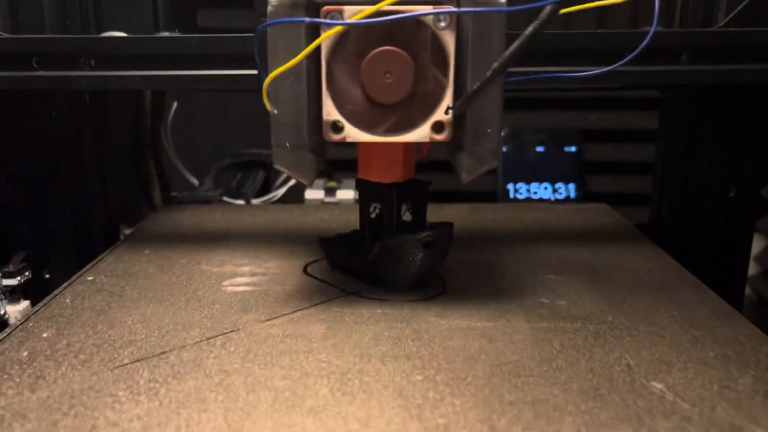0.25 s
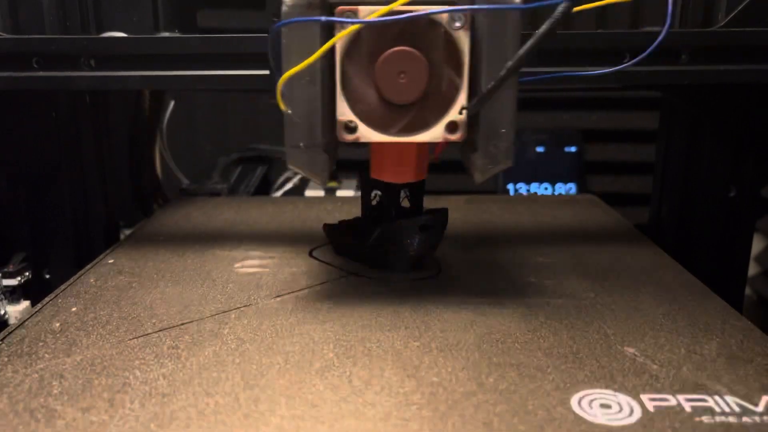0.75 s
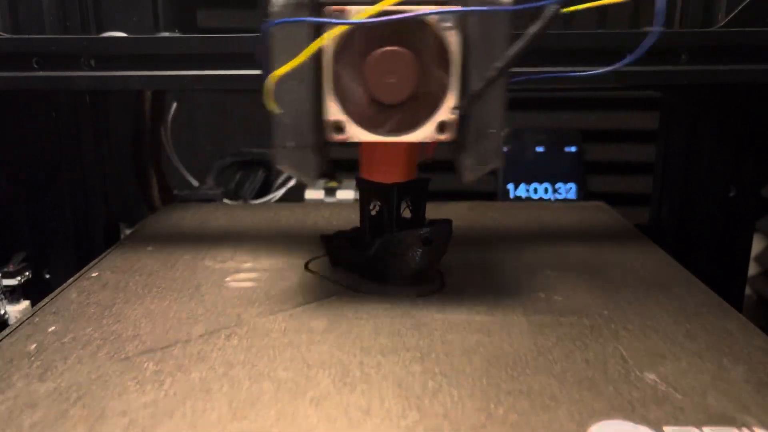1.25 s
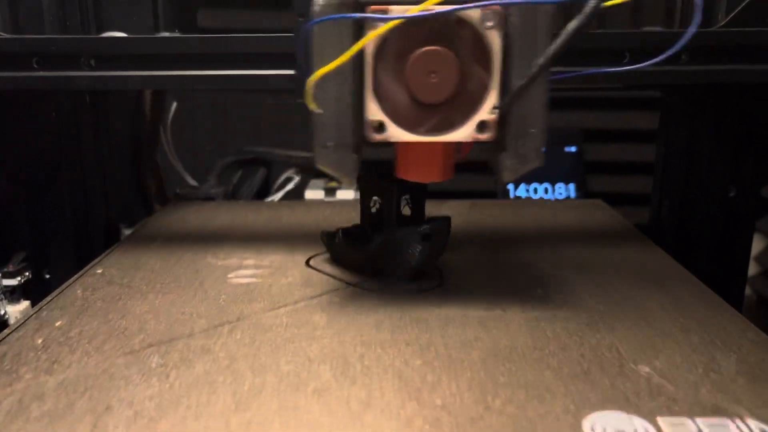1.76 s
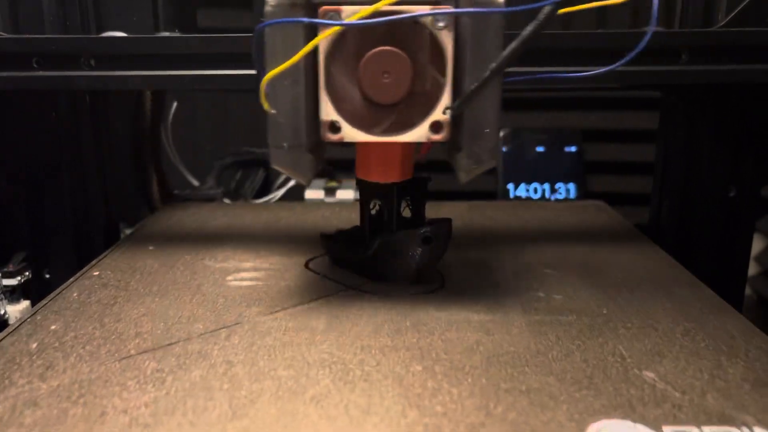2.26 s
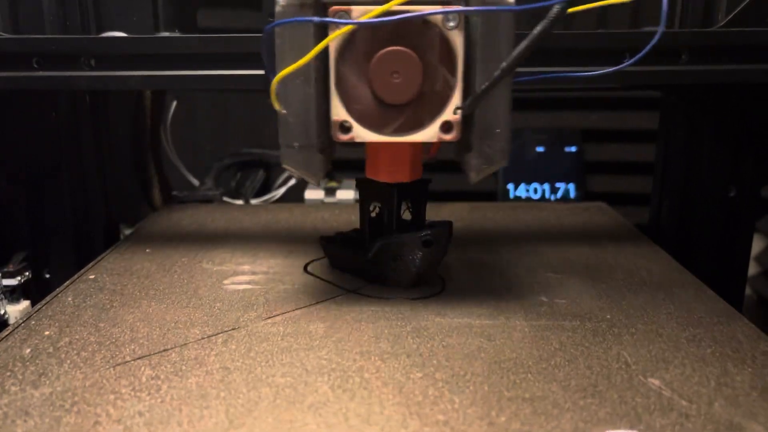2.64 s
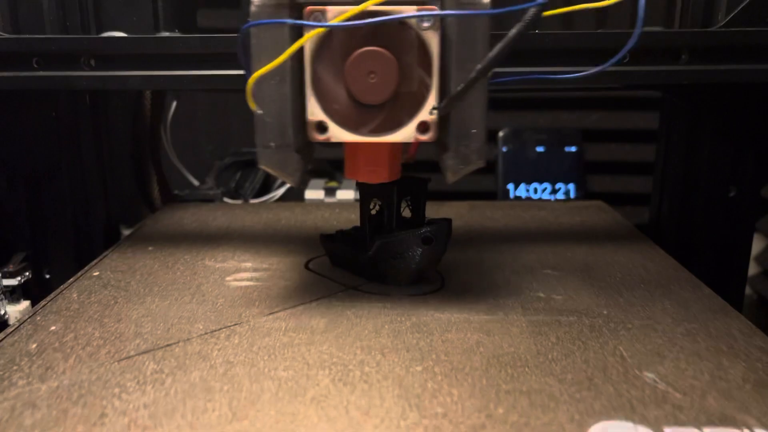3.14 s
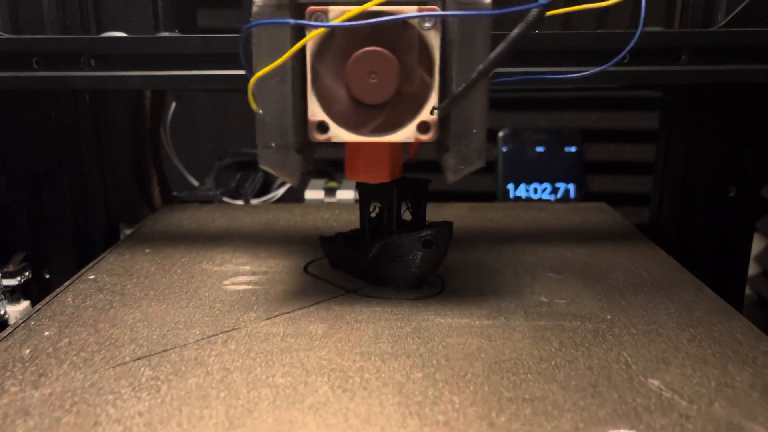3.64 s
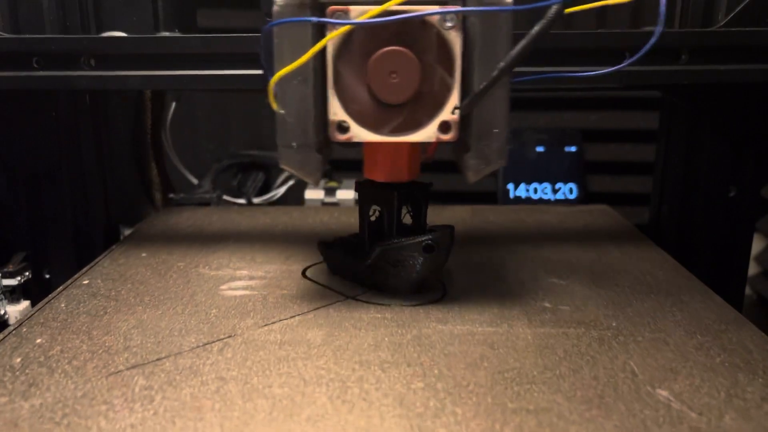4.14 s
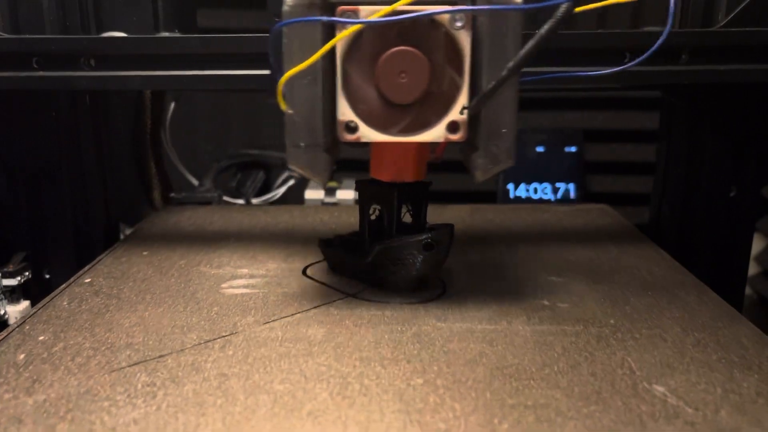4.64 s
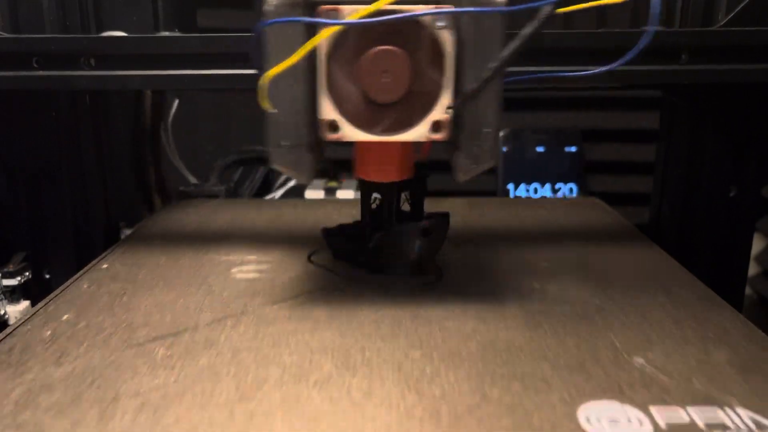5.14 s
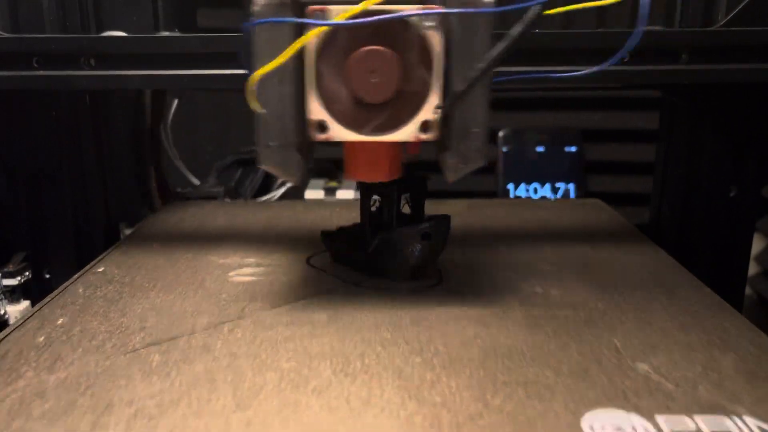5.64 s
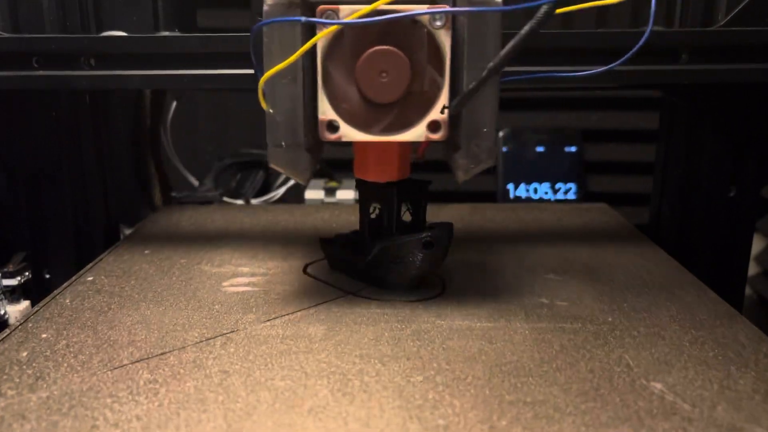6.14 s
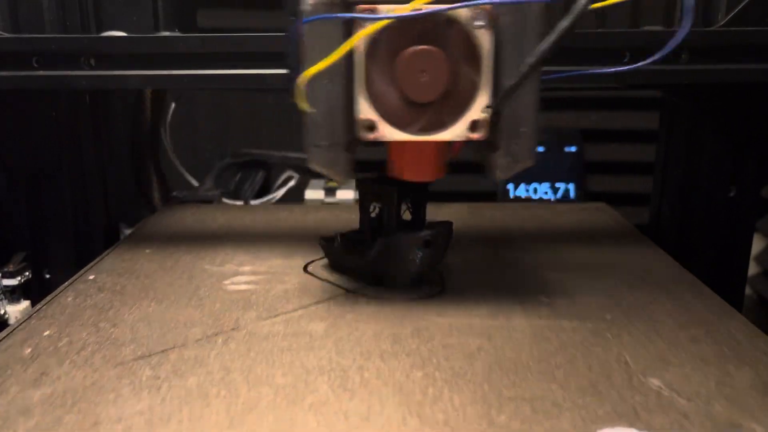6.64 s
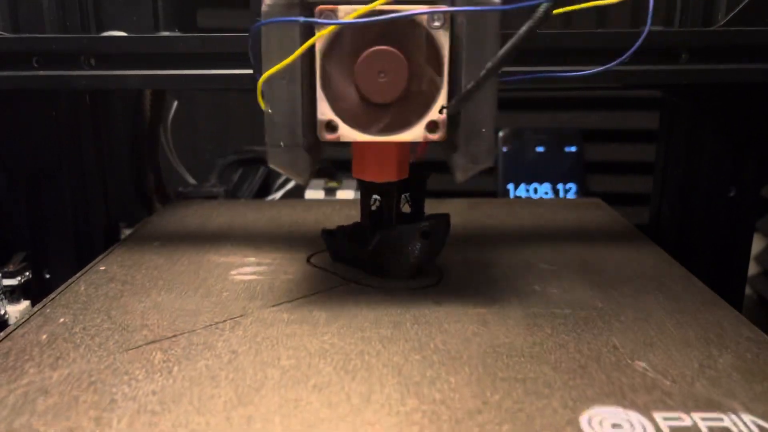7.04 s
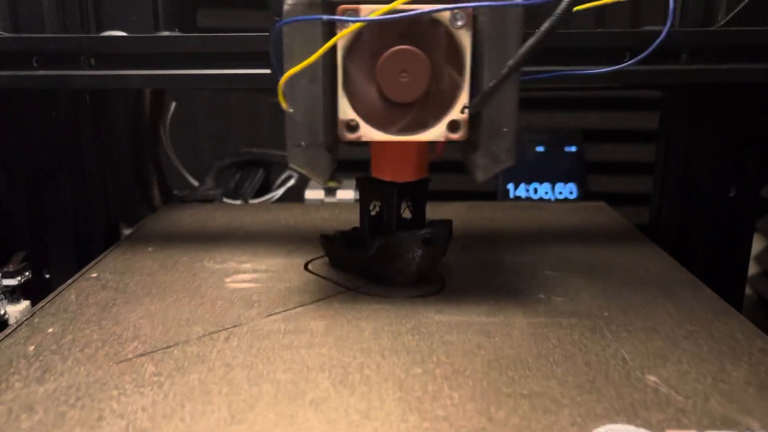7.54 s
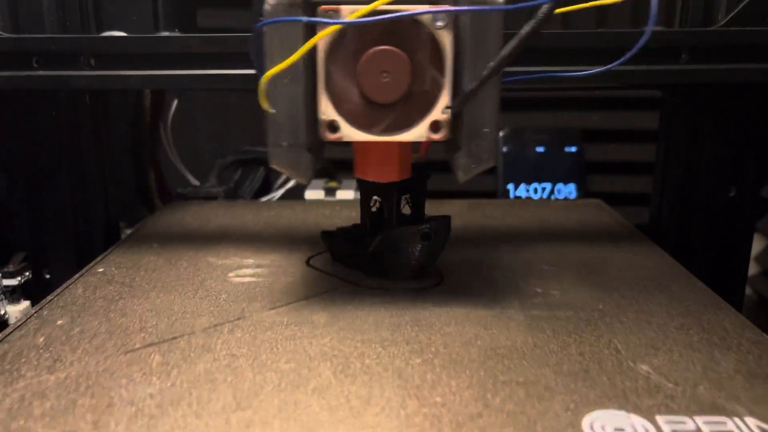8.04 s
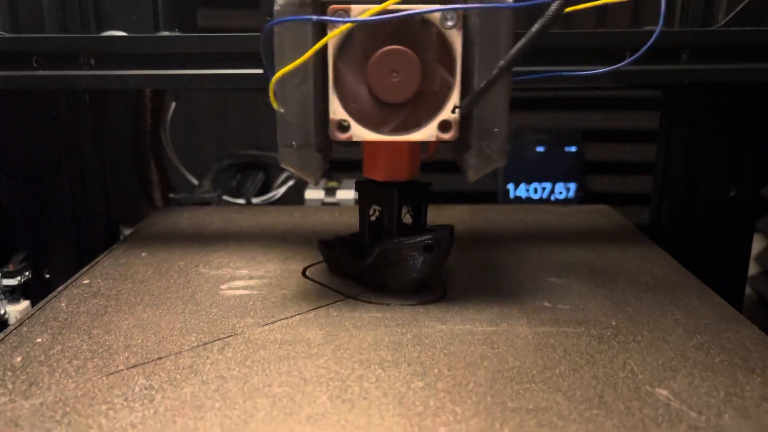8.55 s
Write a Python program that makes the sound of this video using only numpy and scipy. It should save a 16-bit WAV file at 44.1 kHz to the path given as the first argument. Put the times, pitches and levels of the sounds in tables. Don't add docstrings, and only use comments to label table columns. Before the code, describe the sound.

A small printing machine runs throughout, heard very near through two microphone ports. Dark fan noise and fluttering housing tones stay nearly steady while the moving bed makes the frame rumble and panels swell. Very brief low motor hums and higher gliding chirps come in irregular bursts, with tiny carriage clicks. Several dull low thumps mark bed reversals; the last seconds are mostly fan and rumble.

```python
import sys
import numpy as np
from scipy import signal
from scipy.fft import rfft, irfft, next_fast_len
from scipy.io import wavfile
from scipy.ndimage import uniform_filter1d, map_coordinates

SR = 44100
rng = np.random.default_rng(int(sys.argv[2]) if len(sys.argv) > 2 else 0)


def wav_record(signal):
    frames = np.transpose(np.atleast_2d(signal))
    bounded = np.clip(frames, -1, 1)
    quanta = np.round(bounded * 32767).astype(np.int16)
    wavfile.write(sys.argv[1], SR, quanta)


def level_to_linear(level):
    exponent = np.asarray(level, float) / 20
    return 10 ** exponent


N = 387638

# (centre [s], step rate [Hz], level [dB], microstep overtone [dB])
TRAVELS = [(0.021, 250, -35.5, -3), (0.728, 248, -36.5, -9), (0.841, 249.6, -32.5, -14),
           (0.977, 253.6, -29.5, -31), (1.096, 232, -34.5, -14), (1.293, 235, -33, -18),
           (1.382, 284, -34, -14), (1.432, 314, -37, -24), (1.497, 252, -37, -25), (1.517, 327, -33, -31),
           (1.769, 247.6, -32, -19), (3.447, 297, -36.5, -20), (3.558, 694, -39.5, -14),
           (3.816, 233, -36.5, -11), (5.111, 231.6, -29, -22), (5.17, 249.6, -30.5, -25),
           (5.289, 246, -34.5, -11), (5.422, 224, -35.5, -8), (5.675, 248.4, -35.5, -12),
           (5.772, 255, -40, -15), (5.801, 327, -32, -26), (6.418, 264, -35.5, -10), (6.557, 237, -36, -20),
           (6.686, 258, -32, -20), (6.875, 332, -32.5, -32), (6.927, 273, -32.5, -33),
           (7.012, 266, -33, -24), (7.206, 246, -37, -10.5), (7.413, 262, -42, -12), (8.505, 263, -38, -20)]
# (centre [s], start pitch [Hz], end pitch [Hz], length [s], level [dB])
GLIDES = [(0.101, 1265, 1340, .025, -47), (0.1, 1430, 1430, .025, -50), (0.118, 344, 335, 0.033, -29.5),
          (0.793, 1057, 1105, .04, -54), (0.971, 807, 1100, 0.043, -48.5), (1.12, 1060, 1100, .03, -50),
          (1.143, 334, 397, 0.19, -40.5), (1.38, 1313, 1340, 0.026, -45), (1.4, 965, 1004, .03, -48),
          (1.293, 996, 964, .03, -58), (6.568, 990, 1010, 0.055, -52), (6.669, 970, 994, 0.053, -55),
          (6.428, 1110, 980, 0.042, -51), (0.713, 1085, 1010, 0.03, -47), (5.144, 950, 1280, .045, -48),
          (5.40, 910, 1450, 0.012, -40), (5.405, 990, 970, .03, -51), (5.677, 1100, 955, 0.023, -43),
          (5.705, 1010, 1010, .02, -48), (5.768, 1270, 1420, .02, -51), (5.788, 1430, 1226, .022, -44),
          (5.808, 1210, 950, 0.025, -54), (5.795, 535, 486, .04, -36), (6.916, 996, 974, 0.032, -47),
          (2.72, 482, 525, .035, -37), (3.10, 484, 480, 0.036, -41), (3.511, 523, 438, 0.05, -35),
          (3.718, 502, 568, 0.037, -33), (4.32, 460, 450, .04, -38), (7.4, 1306, 770, .04, -47),
          (8.234, 1050, 1070, .03, -58)]


def unit(x):
    return x / np.sqrt(np.mean(x ** 2) + 1e-20)


def along(points, hz):
    f, v = np.transpose(points)
    return np.interp(np.log(hz + 1), np.log(f + 1), v)


def wobble(rate):
    knots = rng.standard_normal(int(N * rate / SR) + 4)
    return map_coordinates(knots, [np.arange(N) * rate / SR])


def filtered(x, response):
    m = next_fast_len(N + SR // 2)
    return irfft(rfft(x, m) * response(np.fft.rfftfreq(m, 1 / SR)), m)[..., :N]


def panned(x, balance_db):
    return x * level_to_linear(np.array([[balance_db / 2], [-balance_db / 2]]))


def swells(rows):
    t = np.arange(0, N, 64) / SR
    curve = sum(db * np.exp(-((t - s) / length) ** 2) for s, db, length in rows)
    return np.interp(np.arange(N) / SR, t, curve)


def shaken(x, level_db, span_s=0.15):
    power = uniform_filter1d(np.mean(x ** 2, axis=0), size=int(span_s * SR))
    return x * level_to_linear(level_db - np.mean(level_db)) / np.sqrt(np.abs(power) / np.mean(x ** 2) + 1e-3)


def steppers():
    out = np.zeros((2, N))
    for s, hz, db, overtone_db in TRAVELS:
        u = np.linspace(-1, 1, int(0.038 * SR))
        step_hz = hz * (1.01 - .12 * np.abs(u) ** 3)
        phase = 2 * np.pi * (np.cumsum(step_hz) / SR + rng.random())
        overtone = level_to_linear(min(overtone_db, -15.5)) * np.sin(4 * phase)
        note = np.cos(np.pi / 2 * u) * (np.sin(phase) + overtone + level_to_linear(-19) * np.sin(2 * phase))
        start = round(s * SR) - len(u) // 2
        out[:, start:start + len(u)] += panned(level_to_linear(db + 1.5) * note, balance_db=-1.5)
    return out * level_to_linear(1.5 * wobble(70))


def chirps():
    # (frequency [Hz], left minus right [dB])
    glide_pan = [(350, -6), (1000, -5), (1500, -9)]
    out = np.zeros((2, N))
    for s, from_hz, to_hz, length, db in GLIDES:
        u = np.linspace(0, 1, int(1.4 * length * SR))
        scatter = np.interp(u, np.linspace(0, 1, num=8), rng.standard_normal(size=8))
        step_hz = (from_hz + (to_hz - from_hz) * u) * (1 + .055 * scatter)
        phase = 2 * np.pi * (np.cumsum(step_hz) / SR + rng.random())
        swell = np.sin(np.pi * u) * (1 + 0.63 * scatter[::-1])
        note = level_to_linear(db + 0.5) * swell * np.sin(phase)
        start = round(s * SR) - len(u) // 2
        out[:, start:start + len(u)] += panned(note, along(glide_pan, from_hz))
    return out


def motors():
    notes = steppers() + chirps()
    mode = lambda f, hz, width: 1j * f * width / (hz * hz - f * f + 1j * f * width)
    gantry = lambda f: .7 * mode(f, hz=992, width=35) + .6 * mode(f, hz=250, width=25)
    return notes + filtered(notes, gantry)


def jolts():
    # (time [s], peak [dB], swing rate [Hz], direction [+1 or -1])
    reversals = [
        (0.0973, -12, 80, 1),
        (0.114, -30, 70, 1),
        (0.262, -21.5, 75, -1),
        (1.70, -29, 74, 1),
        (2.251, -20, 50, 1),
        (4.135, -17, 55.4, 1),
        (5.557, -25, 55, 1),
        (5.75, -18.5, 100, 1),
    ]
    out, t = np.zeros(N), np.arange(N) / SR
    for s, db, hz, direction in reversals:
        cycles = (t - s) * hz
        swing = np.cos(2 * np.pi * cycles) + .3 * np.cos(4 * np.pi * cycles)
        out += np.sign(direction) * level_to_linear(db) * np.exp(-np.abs(cycles / .44) ** 1.5) * swing
    return filtered(out, lambda hz: hz ** 2 / (hz ** 2 + 30 ** 2))


def ticks():
    # (time [s], peak [dB], dull part [dB], brilliance [dB])
    tick_events = [(0.0867, -48, -4, -25), (0.4179, -56, -4, -31), (0.7168, -51, -4, -28),
                   (1.504, -50, 3, -35), (1.722, -48, -4, -23), (1.9714, -49, -1, -26),
                   (2.4104, -57, -4, -28), (3.1378, -60, -4, -28), (3.3994, -60, -4, -27),
                   (4.0948, -48, -6, -24), (4.0972, -51, -7, -18.5), (4.1062, -56, -8, -34),
                   (4.6374, -55, -6, -23), (4.9494, -56, -4, -25), (5.017, -53, -4, -30),
                   (5.1272, -52, -4, -26), (5.1357, -57, -6, -24), (5.1580, -50, -2, -23),
                   (5.1712, -48, -4, -26), (5.252, -53, -6, -25), (5.3941, -49, -4, -34),
                   (5.465, -49, -7, -31), (5.6884, -52, -2, -30), (5.7602, -57, -8, -22),
                   (5.7666, -46, -5, -20.5), (5.7985, -52, -9, -34), (6.429, -48, -4, -23),
                   (6.912, -56, 5, -29), (7.2684, -52, -4, -22), (7.8194, -58, -4, -27),
                   (8.4861, -48, -4, -22)]
    # (frequency [Hz], level [dB])
    click_colour = [(1000, -30), (5000, -10), (8500, 0.5), (10500, -12), (11800, -11), (13000, -34),
                    (14900, -30), (15400, -15), (15800, -17)]
    click, bright, dull = np.zeros((3, 2, N + SR))
    t = np.arange(SR // 20) / SR
    noises = rng.standard_normal((len(tick_events), 4, len(t)))
    for (s, db, dull_db, bright_db), noise in zip(tick_events, noises):
        start = round(s * SR)
        span = slice(start, start + len(t))
        snap = level_to_linear(db + 2.5 - 60 * t / 0.015) * noise[[0, 2, 3]]
        click[:, span] += snap[0] + .2 * snap[1:]
        bright[:, span] += level_to_linear(2.2 * bright_db + 44 - 60 * t / .012) * snap[1:]
        dull[:, span] += level_to_linear(db + dull_db - 60 * t / 0.068) * noise[1]
    snaps = filtered(click[:, :N], lambda hz: level_to_linear(along(click_colour, hz)))
    scrape = filtered(dull[:, :N], lambda hz: 1 / (1 + ((hz - 7000) / 3500) ** 2))
    metal = filtered(bright[:, :N], lambda hz: (hz > 8200) * (1 - .3 * (np.abs(hz - 12700) < 1100)))
    return snaps + scrape + metal


def fan():
    # (time [s], shaft rate [Hz])
    shaft_speed = [(0.0, 29.13), (0.6, 29.12), (1.1, 29.35), (1.7, 28.85), (1.95, 28.76), (2.3, 29.02),
                   (2.65, 29.02), (2.9, 29.16), (3.75, 29.14), (4.55, 28.86), (5.2, 28.88), (5.8, 29.09),
                   (6.3, 28.81), (7.05, 28.93), (7.5, 29.14), (8.75, 29.25)]
    # (shaft order [multiple], level [dB], left minus right [dB], left port's lead [rad])
    shaft_tones = [(2, -54, 6, -0.4), (3, -41.5, -1.5, 2.5), (6, -47, -3, 1.24), (8, -62, -3, 0),
                   (12, -45, -3.5, -0.6), (17, -55, 2, -1.9), (18, -50, -7, 0.28), (19, -56.5, -10, -0.5),
                   (21, -60.5, -10, 0.7), (24, -67.5, -11, 0.2)]
    out = np.zeros((2, N))
    shaft_hz = np.interp(np.arange(N) / SR, *np.transpose(shaft_speed))
    turns = np.cumsum(shaft_hz * (1 + 0.001 * wobble(3.94))) / SR
    for order, db, balance_db, lead in shaft_tones:
        tone = np.sin(2 * np.pi * round(order) * turns + np.array([[lead], [0]]))
        out += panned(np.sqrt(2) * level_to_linear(db + 2.9 * wobble(4.5)) * tone, balance_db)
    return out


def rush(left, right, band, patchy_db):
    # (frequency [Hz], likeness [0-1])
    likeness = [(25, 0.6), (50, .92), (130, 0.67), (230, 0.44), (290, 0.03), (430, 0.03), (530, 0.68),
                (680, 0.35), (900, 0.75), (1060, .85), (1250, 0.75), (1390, 0.46), (1480, 0.83),
                (2100, 0.68), (2650, 0.86), (3230, 0.44), (3700, 0.4), (4200, 0.47), (5080, .2),
                (6890, 0.74),
                (7500, .6), (8250, .995), (10250, .995), (10800, .4), (11300, .6), (11650, .88),
                       (12000, .997), (13750, .997), (14300, .3), (14800, .6), (15200, .99)]
    z = signal.stft(rng.standard_normal((2, N)), nperseg=512)[2]
    patches = uniform_filter1d(rng.standard_normal(z.shape[1:]), size=5, axis=0)
    patches = uniform_filter1d(patches, size=10, axis=1)
    pair = unit(signal.istft(z * level_to_linear(patchy_db * unit(patches)), nperseg=512)[1][:, :N])
    angle = lambda hz: np.arccos(np.clip(along(likeness, hz), -1, 1)) / 2
    mid, side = filtered(pair, lambda hz: band(hz) * np.array([np.cos(angle(hz)), np.sin(angle(hz))]))
    density = lambda hz: level_to_linear(np.array([along(left, hz), along(right, hz)])) * np.sqrt(SR / 2)
    return filtered(np.array([mid + side, mid - side]), density)


def air():
    # (frequency [Hz], density [dB per Hz])
    rumble_left = [(13, -71), (18, -81), (51, -55.5), (94, -51.5), (107, -58), (150, -61.5), (215, -67),
                   (300, -65.5), (430, -66), (470, -69.5), (510, -62), (535, -68), (580, -76.5), (660, -79),
                   (700, -73.5), (799, -77.5)]
    # (frequency [Hz], density [dB per Hz])
    rumble_right = [(13, -76), (18, -85), (48, -54), (94, -50.5), (145, -61.5), (220, -62), (269, -62),
                    (301, -58), (349, -59), (392, -72.5), (425, -69), (470, -64), (616, -66), (643, -67),
                    (799, -71.5)]
    # (frequency [Hz], density [dB per Hz])
    hiss_left = [(818, -74.5), (930, -76.5), (1010, -77), (1050, -73.5), (1220, -74.5), (1270, -78.5),
                 (1390, -77.5), (1560, -75.5), (1650, -78), (2150, -80), (2280, -87), (2420, -82.5),
                 (3050, -87.5), (3500, -87), (3850, -89), (4050, -91.5), (4500, -96.5), (4800, -98),
                 (5450, -96), (5950, -100.5), (6890, -100), (7493, -101.0), (8010, -104.5), (12876, -114.0),
                 (13824, -120.0), (14427, -116.0), (15073, -117.0), (15417, -123.0), (15640, -119.5)]
    # (frequency [Hz], density [dB per Hz])
    hiss_right = [(818, -70.5), (1130, -72), (1170, -72.5), (1210, -70.5), (1260, -75), (1380, -73.5),
                  (1520, -78), (1679, -72), (1790, -77), (1900, -75), (2080, -83), (2190, -76.5),
                  (2300, -82), (2430, -81), (2750, -80.5), (3000, -83.5), (3200, -83.5), (3550, -83),
                  (3750, -80), (3950, -90), (4160, -84), (4550, -92), (4750, -89.5), (4930, -85),
                  (5100, -92), (5700, -90.5), (6050, -94.5), (6847, -97), (7450, -101.0), (9259, -101.0),
                  (13824, -120.0), (14298, -116.0), (15640, -119.5)]
    # (time [s], shaking over usual [dB], length [s])
    table_lurches = [(.105, 13.5, 0.016), (.19, 5.5, 0.096), (.76, -5, 0.11), (.98, 1, 0.066),
                     (1.08, -2, 0.029), (1.61, 6, 0.12), (1.71, 10, 0.023), (1.92, -3, 0.14),
                     (2.25, 0, 0.088), (2.89, 5, 0.05), (3.11, 11, .08), (3.18, -9, 0.059),
                     (3.28, 4, 0.064), (4.11, 3, 0.096), (4.38, 9.5, 0.064), (4.48, -7.5, 0.19),
                     (4.87, 6, 0.069), (5.09, -18, 0.055), (5.16, 5.5, 0.045), (5.56, 10, 0.042),
                     (5.75, 10, 0.037), (6.24, -6, 0.037), (6.29, 6, .04), (6.95, -3, 0.022),
                     (7.17, -7, 0.051), (7.34, -6.5, 0.074), (7.61, -1.5, 0.19), (7.91, -1, 0.054),
                     (7.98, -4, 0.043), (8.08, 6, 0.062)]
    # (time [s], drumming over usual [dB])
    belt_pulls = [(.11, 9.5), (.22, -7), (.9, 4.5), (.98, 6), (1.71, 1), (1.84, -5.5), (2.25, 8.5),
                  (2.89, -0.5), (3.36, 1.5), (4.73, 2.5), (4.87, 2.5), (5.09, 0), (5.56, -2.5),
                  (5.83, -0.5), (6.17, -9.5), (6.24, -3), (6.83, -2), (6.9, 8), (7.34, 4.5), (7.46, -2),
                  (7.83, -5), (7.91, 4), (8.08, 2.5), (8.62, 1)]
    split_hz, pull_s = 808, 0.069
    low = rush(rumble_left, rumble_right, lambda hz: hz < split_hz, patchy_db=1.46)
    table = filtered(low, lambda hz: 1 / (1 + (hz / 95) ** 6))
    body = filtered(low, lambda hz: 1 - 1 / (1 + (hz / 230) ** 6))
    bed = low - table - body
    hiss = rush(hiss_left, hiss_right, lambda hz: hz >= split_hz, patchy_db=0.9)
    pulls = swells([(s, db, pull_s) for s, db in belt_pulls])
    note_dips = swells([(s, -4.5, 0.013) for s, *_ in TRAVELS + GLIDES])
    body_db = np.minimum(note_dips, 4) + 0.4 * pulls
    frame = shaken(table, swells(table_lurches)) + shaken(bed, pulls) + shaken(body, body_db)
    return frame + hiss * level_to_linear(0.081 * wobble(2.66) + 0.075 * wobble(8.2))


def ducts():
    # (frequency [Hz], width [Hz], level [dB], left minus right [dB])
    resonances = [(266, 30, -52, -8), (385.2, 28, -48.5, -7), (445, 74, -57.5, -2), (606, 61, -54, -13.5),
                  (706, 26, -58.5, -8), (984, 98, -65.5, -7.5), (1635, 77, -64, -9), (1890, 84, -65, -13.5),
                  (3676, 40, -68.5, 3), (6830, 110, -72, -2), (7960, 200, -77.5, 8), (8300, 160, -79, 2),
                  (9250, 150, -89, 8), (9300, 70, -103, 4)]
    out = np.zeros((2, N))
    for hz, width, db, balance_db in resonances:
        ring = filtered(rng.standard_normal(N), lambda f: 1 / (1 + ((f - hz) / width * 2) ** 2))
        out += panned(level_to_linear(db) * unit(ring * level_to_linear(2.9 * wobble(12))), balance_db)
    return out


def supply():
    # (mains multiple [-], level [dB], left minus right [dB])
    buzz_tones = [(2, -37, -1.5), (4, -46, -6.5)]
    out, t = np.zeros((2, N)), np.arange(N) / SR
    for multiple, db, balance_db in buzz_tones:
        tone = np.sin(2 * np.pi * (round(multiple) * 50 * t + rng.random()))
        out += panned(np.sqrt(2) * level_to_linear(db + 1.1 * wobble(4)) * tone, balance_db)
    return out


def whine():
    ring = filtered(rng.standard_normal(N), lambda f: 1 / (1 + ((f - 6363) / 22) ** 2))
    return panned(level_to_linear(-80.5) * unit(ring), balance_db=5)


def enclosure(x):
    # (frequency [Hz], half width [Hz])
    modes = [
        (100, 15),
        (350, 14),
        (386, 15),
        (522, 19),
        (192, 33),
        (650, 88),
        (278, 45),
    ]
    # (time [s], over usual [dB], length [s])
    floor = [(0.09, -9, 0.12), (0.67, -1.5, 0.15), (0.958, 4, 0.1), (2.68, -1.5, 0.069), (3.3, 4.5, 0.11),
             (4.22, -0.5, 0.11), (4.683, 3.5, 0.076), (5.106, -1, 0.12), (5.497, -3, 0.06),
             (7.16, -4.5, 0.15), (7.326, 7, 0.053), (7.59, -4, 0.11), (8.094, 4, 0.12)]
    # (time [s], over usual [dB], length [s])
    back = [(0.12, 3.5, 0.11), (1.06, 3.5, 0.12), (1.75, -6.5, 0.2), (2.1, 3.5, 0.06), (2.61, -3.5, 0.2),
            (2.95, -10, 0.065), (3.2, -3, 0.046), (3.36, 6.5, 0.029), (3.66, 5.5, 0.07), (4.4, 6, 0.089),
            (4.86, -8, 0.063), (5.2, 4.5, 0.067), (5.46, -3.5, 0.32), (6.21, -13, 0.059), (6.64, -10, 0.12),
            (6.89, 3, 0.13), (7.05, -4.5, 0.061), (7.3, -3.5, 0.34), (7.62, 9.5, 0.062), (7.84, -3, 0.22),
            (8.35, 3.5, 0.14), (8.57, -12, 0.038)]
    # (time [s], over usual [dB], length [s])
    flank = [(0.53, -8, 0.23), (1.19, 3.5, 0.11), (1.85, 10.5, 0.038), (1.96, -7, 0.064), (2.4, -7.5, 0.14),
             (2.72, 5, 0.16), (2.92, -2.5, 0.11), (3.53, 3, 0.52), (3.99, 0, 0.091), (4.13, 4.5, 0.051),
             (4.95, -5, 0.068), (5.14, 2, 0.13), (5.62, 9, 0.033), (5.92, -13, 0.077), (6.15, -12, 0.12),
             (6.39, 6, 0.04), (6.59, 9, 0.019), (6.78, 3.5, 0.07), (7.0, -4, 0.12), (7.12, 13, 0.03),
             (7.46, -7, 0.1), (7.59, 10, 0.033), (7.78, -9, 0.12), (7.95, 9.5, 0.07), (8.05, -15, 0.062),
             (8.18, 9.5, 0.062), (8.43, 6.5, 0.21)]
    # (time [s], over usual [dB], length [s])
    roof = [(0.55, -5.5, 0.28), (0.66, 7.5, 0.19), (1.67, -6, 0.057), (2.02, -2, 0.03), (2.5, -3, 0.14),
            (2.73, 6, 0.079), (3.03, 5, 0.026), (3.72, -9, 0.074), (3.82, -2, 0.15), (5.06, -9, 0.086),
            (5.27, 4.5, 0.17), (5.79, 2, 0.025), (7.34, 7, 0.084), (7.51, -3.5, 0.14), (7.94, 2, 0.15)]
    # (time [s], over usual [dB], length [s])
    door = [(1.37, 1, 0.39), (2.73, 4.5, 0.056), (3.56, -3, 0.28), (3.93, 5, 0.071), (4.07, -9.5, 0.083),
            (5.67, 2.5, 0.11), (6.07, -10.5, 0.057), (6.83, -7, 0.05), (8.21, -12, 0.033)]
    # (time [s], over usual [dB], length [s])
    lid = [(0.29, -1.5, 0.14), (0.57, -5, 0.035), (0.83, 2, 0.2), (1.88, -2, 0.2), (2.19, -4, 0.054),
           (2.67, 1.5, 0.13), (3.7, 2, 0.099), (4.28, -2, 0.2), (4.49, -0.5, 0.09), (4.88, 0, 0.16),
           (5.37, 1.5, 0.083), (5.96, -3, 0.17), (7.61, 3.5, 0.082), (7.89, 5, 0.059), (8.35, 3, 0.16)]
    # (time [s], over usual [dB], length [s])
    front = [(.4, -1.5, .1), (2.75, 0, 0.07), (3.3, -2.5, 0.11), (4.25, 2, 0.11), (5.3, 1, 0.089),
             (7.1, 0.5, 0.087), (8.68, -4, .08)]
    for (hz, half_width), rows in zip(modes, [floor, back, flank, roof, door, lid, front]):
        hum = filtered(x, lambda f: 1 / (1 + ((f - hz) / half_width) ** 6))
        x = x - hum + shaken(hum, swells(rows), span_s=0.11) * level_to_linear(-0.5)
    return x


def at_ports(x, share):
    # (frequency [Hz],
    # left port's lead [rad])
    port_lead = [(45, .4), (110, 0), (200, .3), (260, -.4), (350, -.6), (520, .6), (590, -.3), (655, -2.7),
                 (700, -1.8), (830, -2.7), (980, -2.3), (1250, -3.1), (1330, -3.45), (1430, -3.1),
                 (1650, -4.2), (2100, -5.6), (2360, -6.6), (3100, -7.9), (3500, -6.7), (3900, -6.3),
                 (4200, -7.3), (4900, -7.2), (5200, -3.9), (6500, -3.5),
                 (8250, 0), (10250, 0), (11400, 2.7), (12000, 3.14), (13800, 3.14), (14900, 6.28),
                   (16000, 6.28)]
    halves = np.array([[1], [-1]])
    return filtered(x, lambda hz: np.exp(.5j * share * along(port_lead, hz) * halves))


def scene():
    airborne = enclosure(at_ports(air() + ducts() + fan() + supply() + ticks(), share=0.98))
    return airborne + at_ports(motors(), share=.35) + whine() + jolts()


def roll_off(x):
    return signal.sosfilt(signal.butter(12, 16470, fs=SR, output="sos"), x)


def record(dry):
    mix = filtered(dry, lambda hz: hz < 15760)
    return roll_off(mix)


dry = scene()
out = record(dry)
wav_record(out)
```